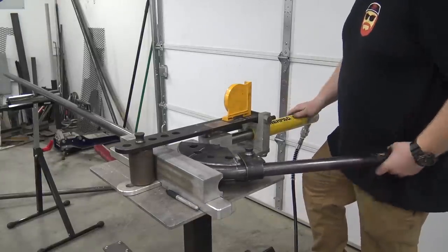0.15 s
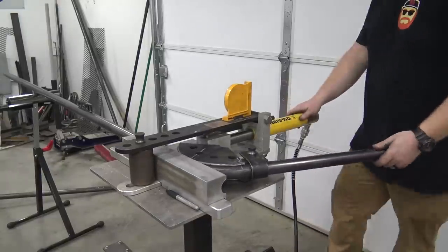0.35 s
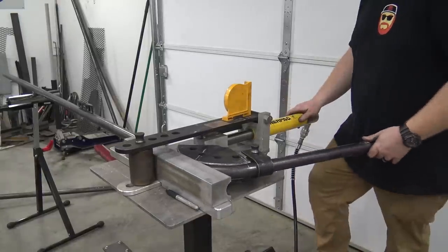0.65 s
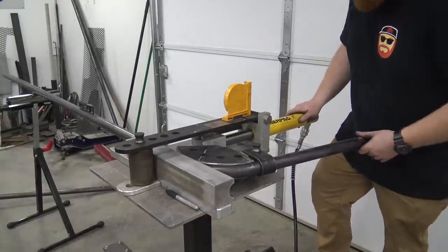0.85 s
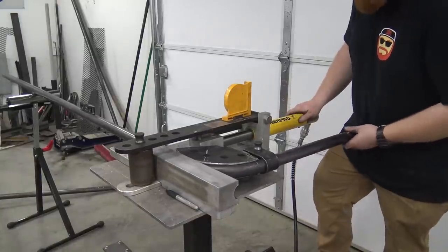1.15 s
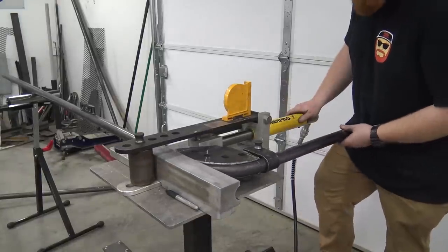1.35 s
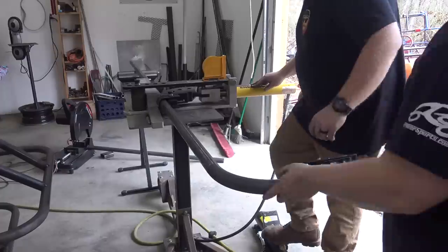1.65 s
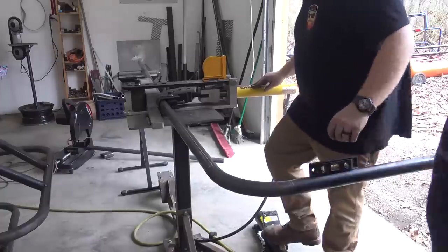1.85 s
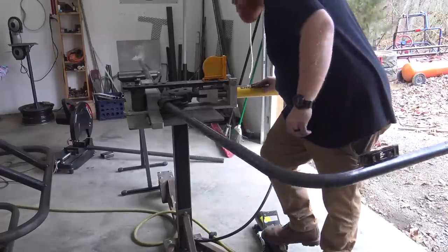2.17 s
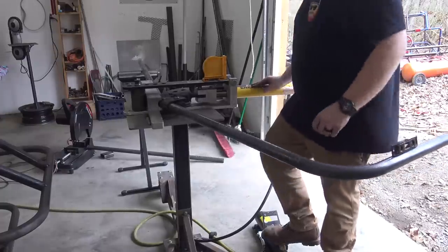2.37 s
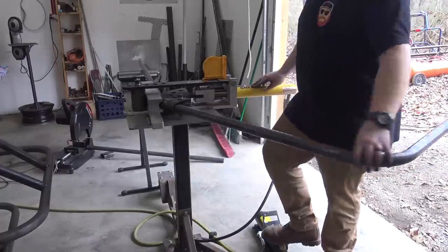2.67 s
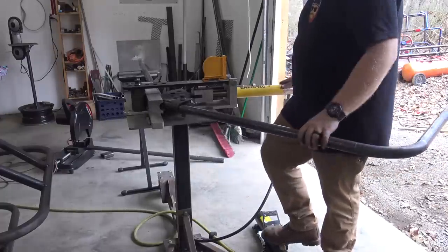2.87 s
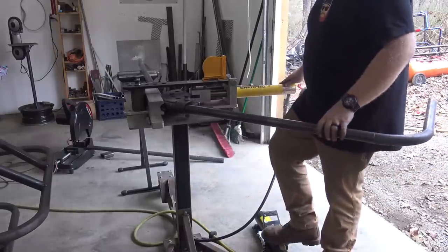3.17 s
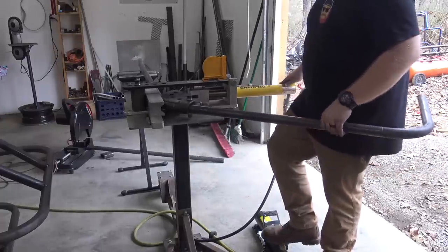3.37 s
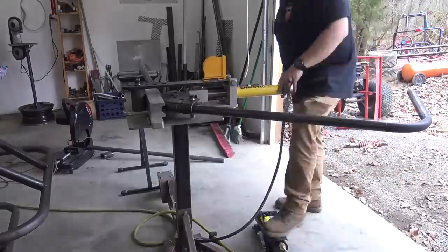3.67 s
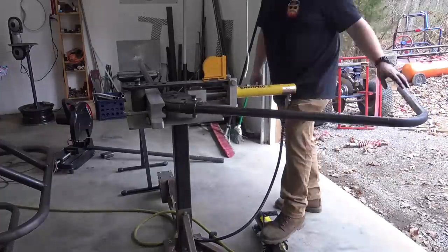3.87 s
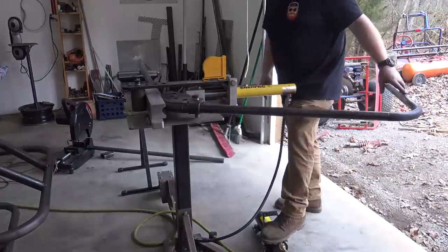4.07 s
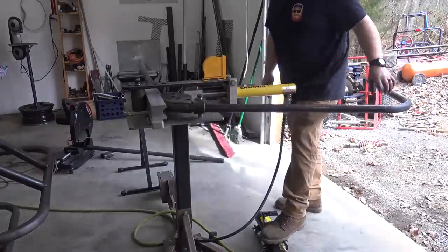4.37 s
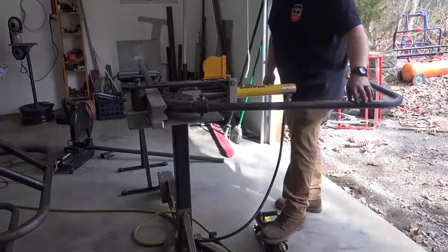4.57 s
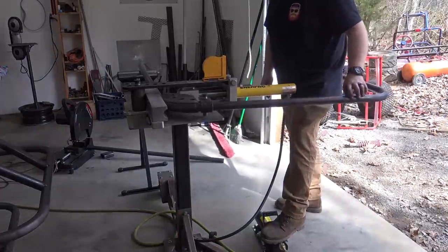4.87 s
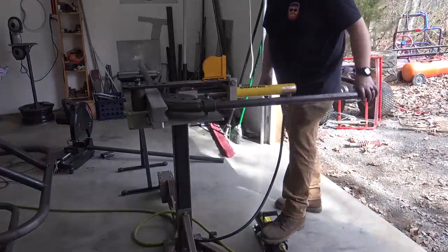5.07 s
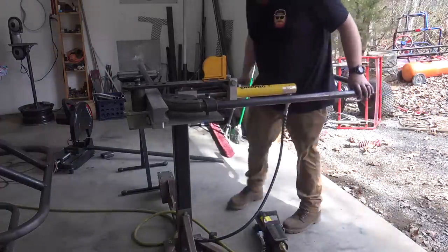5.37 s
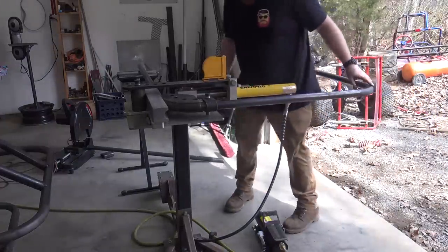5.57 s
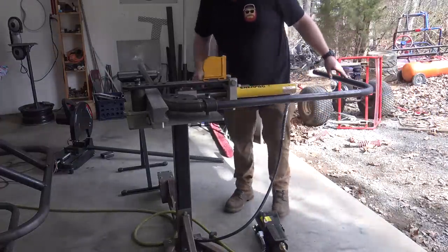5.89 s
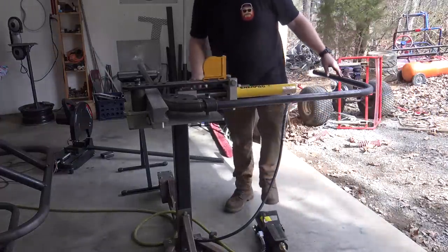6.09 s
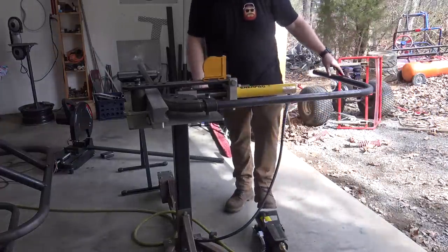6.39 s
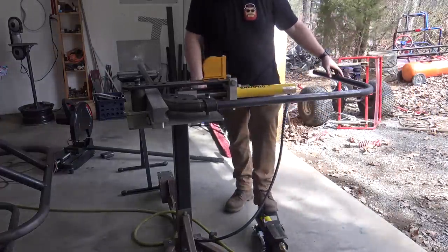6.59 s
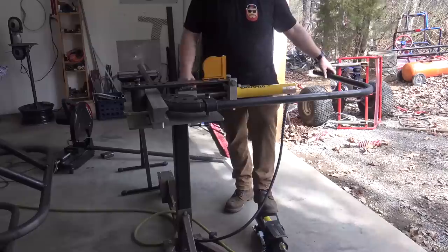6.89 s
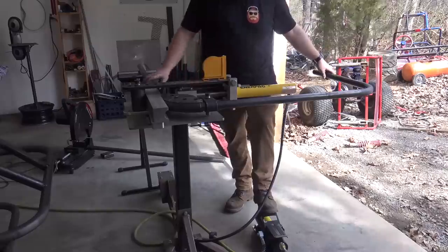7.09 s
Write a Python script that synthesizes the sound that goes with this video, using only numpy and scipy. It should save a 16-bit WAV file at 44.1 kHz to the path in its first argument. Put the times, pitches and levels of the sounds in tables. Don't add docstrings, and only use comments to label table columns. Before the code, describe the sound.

Rapid, even, sharp bursts of vented air hammer close to the microphone in a reverberant garage, then stop abruptly, leaving a quiet low drone with faint stirring leaves.

```python
import sys
import numpy as np
from scipy import signal
from scipy.fft import rfft, irfft
from scipy.io import wavfile
from scipy.ndimage import map_coordinates

SR = 44100
rng = np.random.default_rng(int(sys.argv[2]) if len(sys.argv) > 2 else 0)


def voltage_ratio(decibels):
    exponent = np.asarray(decibels, float) / 20
    return 10 ** exponent


def put_to_file(sound):
    columns = np.atleast_2d(sound).T
    safe = np.clip(columns, -1, 1)
    whole_steps = np.round(safe * 32767)
    wavfile.write(sys.argv[1], SR, whole_steps.astype(np.int16))


N = 319284
CUT_S = 5.415


def rms_one(x):
    return x / np.sqrt(np.mean(x ** 2) + 1e-20)


def at_hz(points, hz, column=1):
    points = np.array(points)
    return np.interp(np.log(hz), np.log(points[:, 0]), points[:, column])


def coloured(spectrum):
    hz = np.maximum(np.arange(N // 2 + 1) * SR / N, 1)
    white = rfft(rng.standard_normal(N))
    return rms_one(irfft(white * voltage_ratio(at_hz(spectrum, hz)), N))


def drift(rate_hz):
    steps = rng.standard_normal(400)
    return map_coordinates(steps, [np.arange(N) / SR * rate_hz], order=2, mode="wrap")


def orders(turns, table, wobble_db):
    out = 0
    for order, db in table:
        gain = voltage_ratio(db + 3 + wobble_db * drift(5.0))
        out = out + gain * np.sin(2 * np.pi * (order * turns + rng.random()))
    return out


def across_cut(before_db, after_db):
    return np.where(np.arange(N) / SR < CUT_S, before_db, after_db)


def swells(table):
    t = np.arange(N) / SR
    return sum(voltage_ratio(db) * np.exp(-((t - s) / half_s) ** 2) for s, half_s, db in table)


# middle in seconds, half length in seconds, level in dB.
RUSTLES = [
    (5.55, .2, -57),
    (6.05, .12, -59),
    (6.44, .22, -56),
    (7.1, .2, -60),
]
# frequency in Hz, level in dB per Hz.
LEAVES = [(3000, -20), (7000, 0), (12000, -3), (16000, -14)]


def leaves():
    return coloured(LEAVES) * swells(RUSTLES)


# start in seconds, length in seconds, level in dB, growth in dB per second.
PULLS = [
    (5.4, 0.56, -38, -12),
    (6.35, 0.615, -42, -4),
]


def far_engine():
    t = np.arange(N) / SR
    turns = 101.1 * t
    nearest_s, fade_db = 6.53, 11
    first = voltage_ratio(-40 - fade_db * (t - nearest_s) ** 2)
    second = voltage_ratio(-51)
    rise_s, fall_s = 0.023, 0.03
    for start_s, length_s, db, growth_db in PULLS:
        since = t - start_s
        rise = np.clip(since / rise_s, 0, 1)
        fall = np.clip(1 - (since - length_s) / fall_s, 0, 1)
        second = second + voltage_ratio(db + growth_db * since) * rise * fall
    low = first * orders(turns, [(1, 0.0)], wobble_db=0.7)
    low += second * orders(turns, [(2, 0.0)], wobble_db=0.7)
    upper = voltage_ratio(-50) * orders(turns, [(3, 0.0), (4, -1.0), (6, -2.0)], wobble_db=2.5)
    return (low + upper) * (t > CUT_S)


# middle in seconds, half length in seconds, level in dB.
GUSTS = [
    (0.1, .5, -31),
    (1.5, 0.91, -38.5),
    (2.8, 0.36, -40),
    (3.9, 0.66, -38),
    (4.8, 0.44, -33.5),
    (5.504, .15, -39),
    (5.878, 0.12, -37.5),
    (6.5, .15, -42),
    (6.863, .12, -37),
]


def wind():
    band = signal.butter(2, [9, 19], "band", fs=SR, output="sos")
    rumble = signal.sosfilt(band, rng.standard_normal(N))
    return swells(GUSTS) * rms_one(rumble)


# order of the motor rotation, level in dB.
MOTOR = [(1, 1.5), (2, -3), (4, -13), (5, -9.5), (9, -20.5)]
# order of the piston rotation, level in dB.
PISTON = [(2, -13.), (3, -15.), (5, -13.), (6, -11.), (7, -16.), (8, -13.), (10, -15.), (13, -8.),
          (14, -14.), (16, -8.), (19, -15.), (20, -12.), (21, -13.), (22, -11.), (23, -13.), (27, -14.),
          (32, -13.)]
# frequency in Hz, level in dB per Hz.
CLATTER = [(30, -14), (60, -18), (130, -15), (300, -11.5), (600, -13.5), (1150, -11), (1600, -18.5),
           (2600, -23), (3500, -22.5), (4300, -26.5), (5200, -23.5), (6500, -32), (10000, -38.5),
           (16000, -47)]


def compressor():
    t = np.arange(N) / SR
    motor_hz, piston_hz = 58.8, 26.2
    load_db = 2.5 * np.maximum(t - CUT_S, 0)
    motor = voltage_ratio(across_cut(-36.8, -43.5)) * orders(motor_hz * t, MOTOR, wobble_db=-1.3)
    piston = voltage_ratio(across_cut(-56, -41) + load_db) * orders(piston_hz * t, PISTON, wobble_db=-1.5)
    beat_db = 0.5 * np.sin(2 * np.pi * piston_hz * t) + 0.3 * drift(9.8)
    clatter_db = across_cut(-43, -37) + 0.54 * load_db + beat_db
    return motor + piston + voltage_ratio(clatter_db) * coloured(CLATTER)


STROKE_COUNT = 46
# stroke number, seconds to the next stroke.
PACE = [
    (0, .12635),
    (1, .12516),
    (4, .12469),
    (11, .12098),
    (16, .1193),
    (21, .11758),
    (24, .1149),
    (33, .11299),
    (38, .11314),
    (44, .11216),
]


def strokes():
    number, gap_s = np.transpose(PACE)
    gaps = np.interp(np.arange(STROKE_COUNT - 1), number, gap_s)
    return 0.0219 + np.cumsum(np.r_[0, gaps])


def train(level_db):
    clicks = np.zeros(N)
    clicks[np.round(strokes() * SR).astype(int)] = voltage_ratio(level_db)
    return clicks


def played(clicks, shape, lead=0):
    return signal.fftconvolve(clicks, shape)[lead:lead + N]


# frequency in Hz, width in Hz, height in dB.
RACKS = [(670, 60, 4.), (1100, 40, 4.), (1304, 35, 4.), (1706, 40, 3.), (2377, 50, 5.), (2937, 40, 4.),
         (3111, 40, 4.), (3628, 110, 4.), (3804, 40, 3.), (5040, 150, 2.), (5500, 80, 2.), (11600, 300, 2.)]


def ringing_air():
    hz = np.arange(N // 2 + 1) * SR / N
    peaks_db = sum(db / (1 + (2 * (hz - centre) / width) ** 2) for centre, width, db in RACKS)
    return irfft(rfft(rng.standard_normal((2, N))) * voltage_ratio(peaks_db), N)


def swell(t, arrive_s, build_s, early_db):
    far_walls = 1 / (1 + np.exp(-(t - arrive_s) / build_s))
    return (voltage_ratio(early_db) + far_walls) * np.minimum(t / 0.0086, 1)


# frequency in Hz, level in dB per Hz, time to fall 60 dB in seconds.
WASH = [(443, -13, 0.19), (766, -6, 0.19), (1300, -4.5, 0.22), (1780, -11, 0.3), (2610, -6.5, 0.23),
        (3890, -1.5, 0.23), (4500, -10.5, 0.26), (5400, 5, 0.12), (5900, -7.5, 0.24), (7360, -11, 0.23),
        (9200, -13.5, 0.26), (11440, -7.5, 0.24), (14000, -10, 0.16), (15600, -13, 0.21)]


def jet_wash(level_db, vary_db):
    t = np.arange(SR // 3) / SR
    white = ringing_air()
    edges = 300 * 2 ** np.arange(0, 6, 1 / 4)
    out = 0
    for k, (low, high) in enumerate(zip(edges, edges[1:])):
        band = signal.sosfilt(signal.butter(2, [low, high], "band", fs=SR, output="sos"), white[k % 2])
        hz = np.sqrt(low * high)
        lag = np.sqrt(5000 / hz)
        grow = swell(t, arrive_s=0.013 + 0.0035 * lag, build_s=0.0011 * lag, early_db=-8.5)
        fade = grow * voltage_ratio(at_hz(WASH, hz) - 60 * t / at_hz(WASH, hz, column=2))
        hits = train(level_db + vary_db * rng.standard_normal(STROKE_COUNT))
        power = played(hits ** 2, fade ** 2)
        out = out + band * np.sqrt(np.maximum(power, 0))
    return out


# delay in seconds, level in dB, sign.
ECHOES = [(.0137, -25, 1.), (.0219, -22, 1.), (.0235, -23, -1.), (.0298, -21, -1.), (.0408, -20, 1.),
          (.042, -16, -1.), (.044, -22, 1.), (.0467, -21, -1.), (.049, -22, 1.), (.066, -27, -1.),
          (.077, -25, 1.)]


def fixed_walls(t60):
    t = np.arange(SR // 3) / SR
    build = swell(t, arrive_s=0.0069, build_s=0.0069, early_db=-4.5)
    dense = voltage_ratio(-60 * t / t60) * build * rng.standard_normal(len(t))
    single = np.zeros(len(t))
    for delay, db, sign in ECHOES:
        single[round((delay - 0.0003) * SR)] += sign * voltage_ratio(db + 3.5)
    return dense, single


# delay in seconds, frequency in Hz, level in dB, 60 dB fall in seconds.
DOOR = [
    (.03855, 672, -18, .09),
    (.0393, 460, -22, .06),
    (.072, 672, -30, .1),
]


def door():
    out = 0
    for delay, hz, db, t60 in DOOR:
        late = np.maximum(np.arange(SR // 5) / SR - delay, 0)
        ring = voltage_ratio(db - 60 * late / t60) * np.sin(2 * np.pi * hz * late)
        out = out + ring * (1 - np.exp(-late / 0.002))
    return out


def pulse_shape(rebound, rebound_s, sag, sag_s):
    t = np.arange(SR // 20) / SR - 1 / 1000
    swings = [(0, 0.00033, -1.1), (0.00048, 0.00016, 0.42), (0.0009, 0.0002, -0.8)]   # s, half width s, height
    dips = sum(height * np.exp(-((t - at) / width) ** 2) for at, width, height in swings)
    late = np.maximum(t - 0.0005, 0)
    port_hz, port_db, port_t60 = 5200, -10, 0.008
    ring = voltage_ratio(port_db - 60 * late / port_t60) * np.sin(2 * np.pi * port_hz * late)
    overpressure = rebound * late / rebound_s * np.exp(1 - late / rebound_s)
    slow_sag = sag * late / sag_s * np.exp(1 - late / sag_s)
    return dips + ring + overpressure + slow_sag


# frequency in Hz, level in dB per Hz.
JET = [(710, -36), (1200, -8.5), (1700, -17), (3780, -11.5), (5250, -0.5), (6680, -10.5), (7610, -12.5),
       (8310, -7.5), (9070, -7), (11900, -3), (15000, -4.5), (15800, -1), (16400, -15)]


def air_jet(level_db):
    t = np.maximum(np.arange(SR // 20) / SR - 0.0004, 0)
    opening = 1 - np.exp(-t / 0.000095)
    burst = opening * (np.exp(-t / 0.003) + voltage_ratio(-15.5) * np.exp(-t / 0.025))
    return coloured(JET) * played(train(level_db + 5.5), burst)


def pump():
    s, chance = strokes(), rng.standard_normal((STROKE_COUNT, 4))
    pulse_db = -5.5 - 0.38 * s + 0.55 * chance[:, 0]
    jet_db = -8 + 1.08 * chance[:, 1]
    wash_db = -18.5 - 0.29 * s + 0.18 * chance[:, 2]
    door_db = pulse_db - 2.0 + 1.5 * chance[:, 3]

    shape = pulse_shape(rebound=0.32, rebound_s=0.0011, sag=-0.02, sag_s=0.009)
    pulse = played(train(pulse_db), shape, lead=SR // 1000)
    jet = air_jet(jet_db)

    dull = signal.sosfilt(signal.butter(2, 1300, fs=SR, output="sos"), pulse)
    dull_jet = signal.sosfilt(signal.butter(2, 7000, fs=SR, output="sos"), jet)
    dense, single = fixed_walls(t60=0.31)
    echoes = played(dull, single)
    echoes += played(voltage_ratio(-44) * dull + voltage_ratio(-39) * dull_jet, dense)
    echoes += played(train(door_db), door())
    wash = jet_wash(wash_db + 14.5, vary_db=1.1)

    before_cut = np.clip((CUT_S - np.arange(N) / SR) / 0.0053, 0, 1)
    return (pulse + jet + echoes + wash) * before_cut


def scene():
    return (leaves() + far_engine() + wind() + compressor() + pump())[None]


def top_cut(x):
    return signal.sosfilt(signal.butter(12, 16520, fs=SR, output="sos"), x)


def record(dry):
    low_pass = signal.cheby2(12, 55, 16250, fs=SR, output="sos")
    x = signal.sosfilt(low_pass, dry)
    return top_cut(np.clip(x, -0.97, 0.97))


dry = scene()
out = record(dry)
put_to_file(out)
```